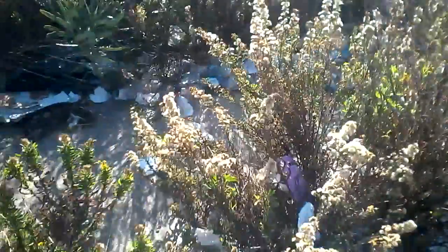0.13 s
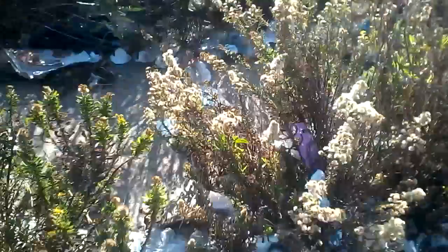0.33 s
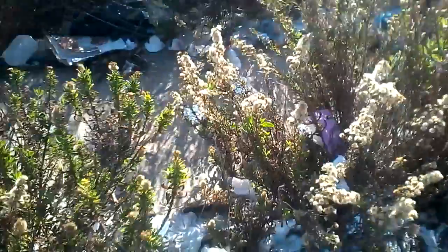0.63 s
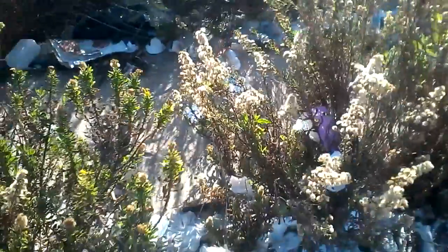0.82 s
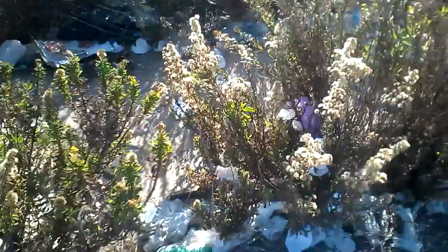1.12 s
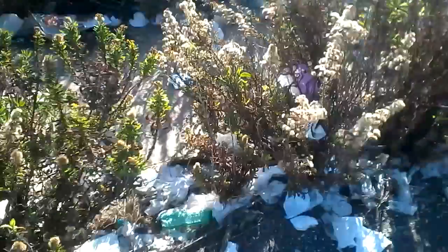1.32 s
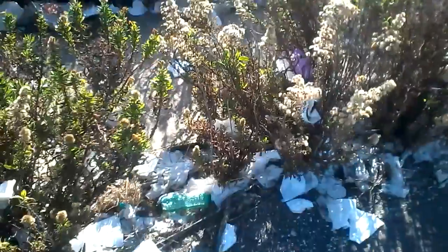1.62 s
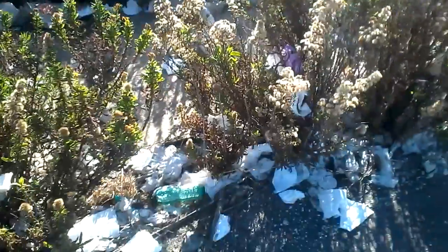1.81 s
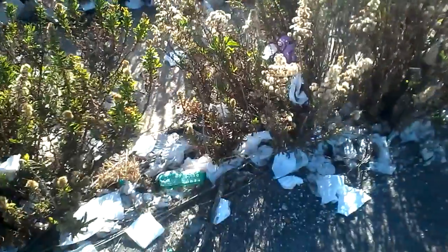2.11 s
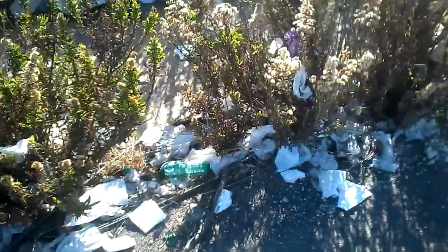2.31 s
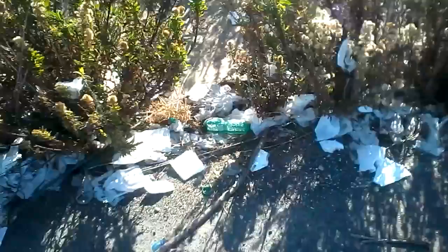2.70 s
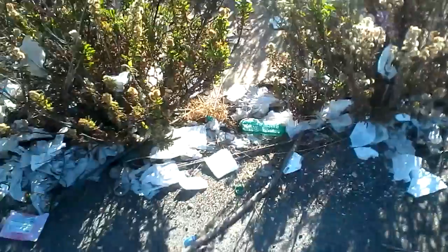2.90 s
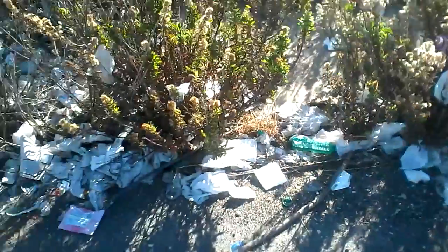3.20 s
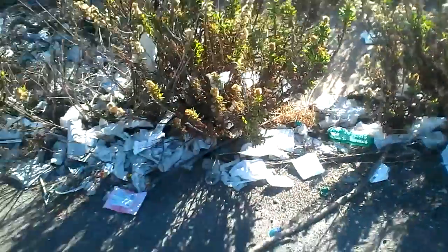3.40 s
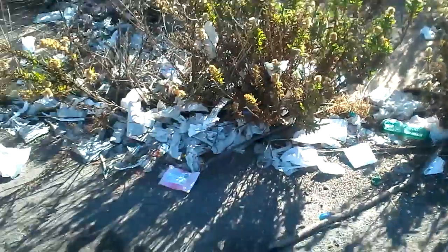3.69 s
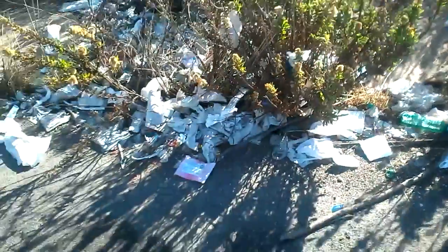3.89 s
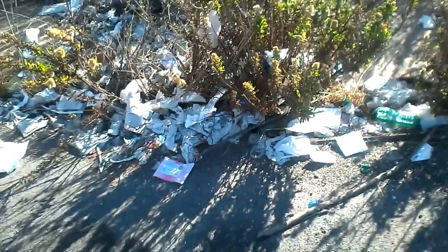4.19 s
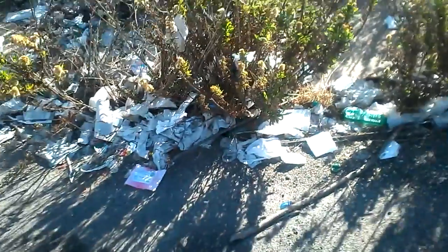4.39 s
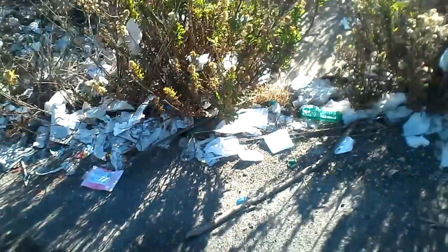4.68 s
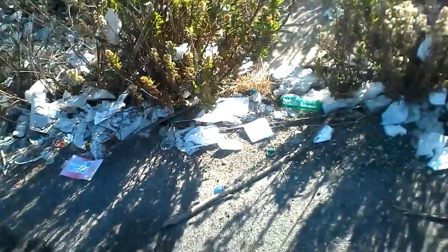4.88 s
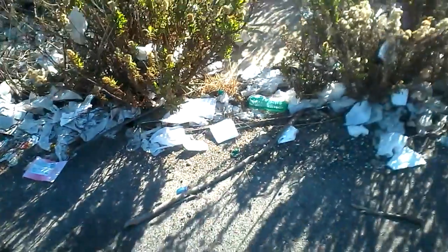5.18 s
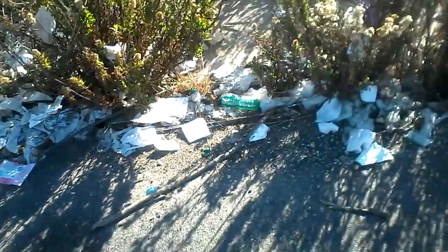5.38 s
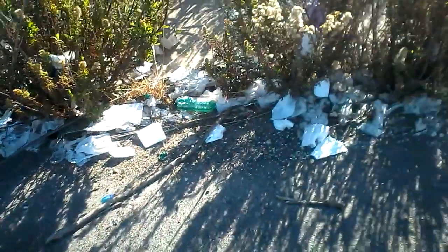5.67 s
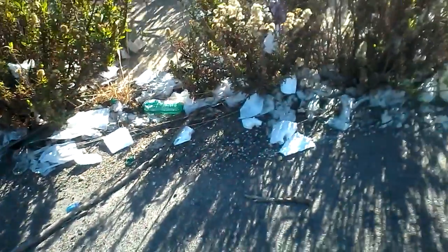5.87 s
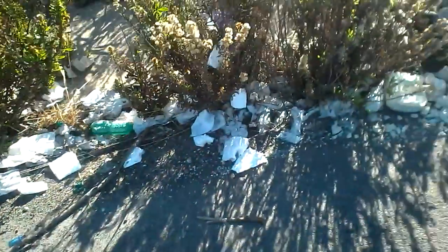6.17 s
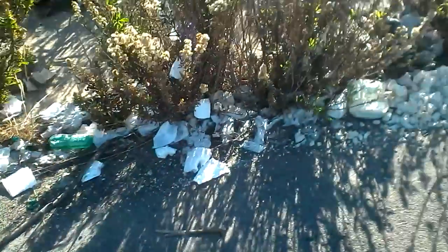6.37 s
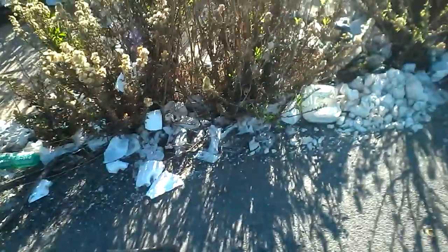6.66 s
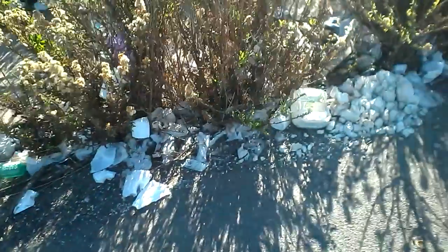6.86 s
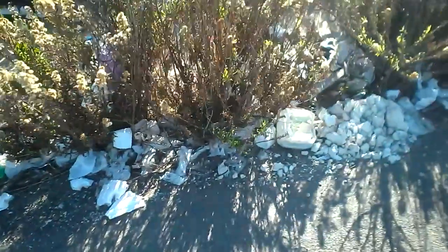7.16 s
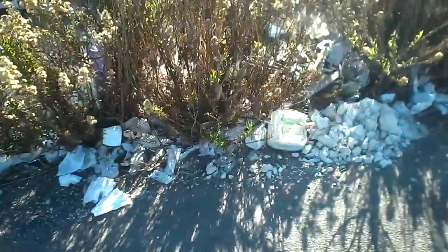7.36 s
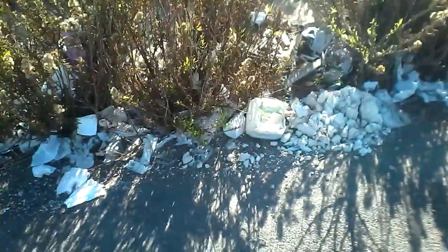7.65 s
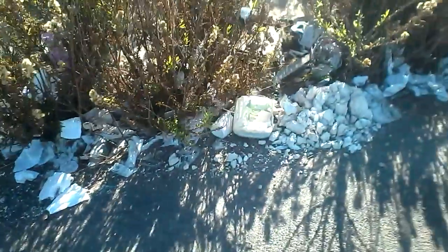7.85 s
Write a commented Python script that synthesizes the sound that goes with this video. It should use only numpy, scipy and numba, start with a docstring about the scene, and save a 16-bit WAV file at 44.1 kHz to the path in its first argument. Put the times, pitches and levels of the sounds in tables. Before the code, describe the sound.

Close, slightly muffled outdoor sound from a small microphone exposed to wind, highs cut off. From 0 to 1.2 s gusts rumble and flutter, with a rushing start, small pops, and short gritty scrapes and cracks underfoot at 0.1 to 0.5 s. The wind sinks from 1.5 to 2.7 s, exposing faint distant machine hum and hiss, a sharp grit snap at 1.9 s and more near 2.5 s. Around 3 s a bright crunchy scuff leads into the heaviest buffeting, 3.1 to 3.8 s, with dense thumps and loud pops, squeezed at the peaks. It drops near 4.2 s, where a faint mid-pitched distant tone briefly passes. A burst with a very hard pop hits at 4.9 s, smaller cracks follow near 5.4 s, and rumbling gusts return from 5.8 to 6.9 s. The wind then eases, with sparse small grit cracks from 7.2 to 7.6 s and a soft windy end at 8 s.

```python
"""Gusty wind and gritty footsteps

Someone shuffles along the gritty edge of a road holding a small camera in a gusty wind.
Wind is filtered lumpy noise: a rumble, a rush, short buffets and pressure pops on the microphone port.
Under the soles grit cracks as ringing noise snaps and scrapes as dense random clicks.
Far industry hums as coloured noise, one distant sine sounds briefly; a limiter holds the strongest gusts."""
import sys
import numpy as np
from scipy import signal
from scipy.fft import rfft, irfft
from scipy.io import wavfile
from scipy.ndimage import uniform_filter1d, minimum_filter1d
from numba import njit

SR = 44100
rng = np.random.default_rng(int(sys.argv[2]) if len(sys.argv) > 2 else 0)


def transcribe(u):
    """Save the signal u as a 16-bit wav file named by the first command-line argument.

    u: samples, shape (n,) or (channels, n), limited to [-1, 1]; the rate is SR.
    q: integer samples, one column per channel.
    """
    v = np.clip(np.atleast_2d(u).T, -1, 1)
    q = np.round(v * 32767).astype(np.int16)
    wavfile.write(sys.argv[1], SR, q)


N = 353770

# hard eddies slapping the port:
# (time [s], nominal length [ms], level before trim [dB], brightness [dB], low thump level [dB])
HARD_EDDIES = [(0.015, 7, -23, -9.5, -33), (0.031, 21, -24, -20, -37), (0.104, 36, -31, -24, -28),
               (.24, 18, -43, -32, -25), (0.409, 11, -36, -26, -36), (0.425, 13, -23.5, -26.5, -31),
               (0.512, 27, -30.5, -8, -45), (0.662, 22.4, -18, -13.5, -21), (0.734, 14, -27.5, -25.5, -26),
               (0.818, 20, -26.5, -23, -17), (0.857, 19, -31, -22, -22), (1.09, 16, -33, -26, -31),
               (1.136, 11, -31, -25, -22), (2.979, 15, -30, -19, -36), (3.051, 12, -27, -31, -23),
               (3.12, 11.4, -16.5, -30.5, -23), (3.147, 28, -14, -17, -15), (3.228, 32, -18.5, -12.5, -27),
               (3.26, 20, -21.5, -19, -19.5), (3.297, 12, -33, -27, -18.5), (3.366, 42, -22, -16, -24),
               (3.401, 51, -23, -20, -25), (3.444, 41.6, -9.5, -21, -20.5), (3.478, 13, -16, -13, -17),
               (3.591, 17.6, -12, -13, -23), (3.607, 21.4, -8.5, -19, -21.5), (3.677, 26, -24, -31, -27),
               (3.773, 13.4, -17, -24, -15.5), (3.808, 9.7, -30, -26, -29), (4.272, 20, -24, -26, -20.5),
               (4.584, 4, -25, -28, -40), (4.712, 11, -31, -23, -38), (4.749, 15, -17, -21, -18),
               (4.82, 12, -27, -17, -24), (4.837, 32, -20.5, -22.5, -20.5), (4.866, 27, -20, -15, -25),
               (4.88, 43, -17, -14, -25), (4.915, 12.8, -14, -17, -14.5),
               (4.958, 17.5, -25.5, -16.5, -36.5), (5.041, 11, -35, -23, -28), (5.267, 15, -21.5, -31, -33),
               (5.51, 21, -23, -32.5, -28), (5.606, 18, -25, -30, -27), (5.667, 10, -30, -36, -21),
               (5.752, 73, -35, -15.5, -24.5), (5.806, 20.5, -12.5, -23.5, -20.5),
               (5.865, 11, -38, -30, -19), (5.895, 21, -30, -21.5, -25), (6.064, 11, -18.5, -26, -14.5),
               (6.149, 24, -30, -25.5, -25), (6.197, 12, -24.5, -18, -25), (6.248, 11, -15.5, -26.5, -13.5),
               (6.296, 13, -23.5, -18, -19), (6.323, 18, -15, -24.5, -17), (6.371, 40, -25.5, -17, -28),
               (6.508, 21, -28, -17, -16.5), (6.55, 28, -20, -25, -18), (6.703, 6.4, -25, -32, -31.5),
               (6.747, 26, -22, -30.5, -22.5), (6.773, 26.6, -20.5, -18.5, -23),
               (6.985, 10.5, -25.5, -34, -21.5), (7.215, 9.9, -38, -33, -26), (7.57, 13, -42.5, -30, -27)]
# soles dragged over grit: (start [s], length [s], level [dB], centre [Hz])
SOLE_DRAGS = [(.105, 0.022, -46.5, 5000), (0.251, 0.22, -60, 4000), (0.471, 0.164, -44, 2950),
              (1.865, .09, -56, 3500), (2.447, 0.092, -51, 4500), (2.805, 0.2, -63, 3500),
              (2.948, 0.11, -44, 6000), (3.021, 0.19, -57, 5460), (3.325, 0.19, -45.5, 3500),
              (4.0, 0.16, -64, 2500), (5.395, 0.031, -52, 3500), (6.195, 0.14, -68, 3000),
              (6.529, 0.064, -51, 2800), (6.752, 0.048, -53, 2600), (7.2, 0.099, -72, 3000)]


def undb(db):
    """Gain of a level in dB."""
    return 10 ** (np.asarray(db) / 20)


def rms(x):
    """Root mean square."""
    return np.sqrt(np.mean(x ** 2))


def unit(x):
    """Scaled to rms 1."""
    return x / rms(x)


@njit
def svf(x, hz, k):
    """State-variable filter with a moving centre and damping k: rows low-pass, band-pass."""
    y, b, l = np.empty((2, len(x))), 0., 0.
    for i in range(len(x)):
        g = np.tan(np.pi * hz[i] / SR)
        v = (b + g * (x[i] - l)) / (1 + g * (g + k))
        y[0, i], y[1, i] = l + g * v, k * v
        b, l = 2 * v - b, l + 2 * g * v
    return y


def low(x, hz, k=1.537):
    """Two-pole low-pass."""
    return svf(x, np.clip(hz + 0 * x, 20, SR / 4), k)[0]


def band(x, hz, width):
    """Two-pole band-pass."""
    return svf(x, hz + 0 * x, width / hz)[1]


def smooth_twice(x, size):
    """Two running means in a row."""
    return uniform_filter1d(uniform_filter1d(x, size), size)


def walk(rate):
    """Random levels held 1 / rate s and slewed twice; spread 1."""
    hold = int(SR / rate)
    steps = np.repeat(rng.standard_normal(N // hold + 1), hold)
    return unit(smooth_twice(steps, hold)[:N])


def steady(x, s):
    """Level evened out over s seconds, so that a curve sets the loudness."""
    return x / np.sqrt(smooth_twice(x ** 2, int(s * SR)))


def add(out, s, x):
    """Mixes x into out from time s."""
    i = int(s * SR)
    out[i:i + len(x)] += x[:N - i]


def yard():
    """Far machines and hiss as noise shaped to a smooth spectrum, plus one brief distant sine."""
    # far machines and microphone hiss: (frequency [Hz], relative density [dB per Hz])
    spectrum = [(150, -32.5), (250, -2), (529, -13.5), (848, -8), (968, -13), (1090, -14), (1210, -16),
                (2340, -19), (3590, -26), (6850, -27), (8420, -36), (10900, -77.5), (18500, -120)]
    # distant tone: (time [s], level [dB])
    tone_curve = [(3.85, -71), (3.95, -56), (4.1, -51), (4.35, -56), (4.5, -77.5)]
    hiss_db, waver_db, tone_hz = -51.5, .5, 645
    f, t = np.maximum(np.arange(N // 2 + 1) * SR / N, 1), np.arange(N) / SR
    points_hz, points_db = np.transpose(spectrum)
    colour_db = np.interp(np.log(f), np.log(points_hz), points_db)
    hiss = unit(irfft(rfft(rng.standard_normal(N)) * undb(colour_db), N))
    hiss = hiss * undb(hiss_db + waver_db * walk(2.92))
    tone_gain = np.sqrt(2) * undb(np.interp(t, *np.transpose(tone_curve)))
    return hiss + tone_gain * np.sin(2 * np.pi * tone_hz * t)


def scuffs():
    """Dense uneven clicks while a sole slides, ringing in the grit."""
    # ring of stones and sole: (centre [Hz], width [Hz], level [dB])
    ring_bands = [(2270, 320, 13.5), (4300, 1800, -19), (6800, 2200, -13)]
    clicks_per_s = 2200
    out, size = np.zeros(N), SR // 4
    t = np.arange(size) / SR
    for s, length_s, db, hz in SOLE_DRAGS:
        clicks = (rng.random(size) < clicks_per_s / SR) * rng.standard_normal(size)
        clicks = clicks * undb(1.2 * rng.exponential(1, size))
        clicks = clicks * undb(3.3 * walk(146)[:size])
        ring = sum(undb(g) * band(clicks, 1. * f, w) for f, w, g in ring_bands)
        body = band(ring, 1. * hz, 0.47 * hz) + undb(-5.0) * band(clicks, 1100., 1200.)
        slide = np.sin(np.pi * np.clip(t / length_s, 0, 1) ** 0.56)
        add(out, s, unit(body * slide) * rms(slide) * undb(db))
    return out


def small_grains(count):
    """Crack rows at chance times along each drag, at most count each; longer drags hold more."""
    grains_per_s = 41
    mid_db, mid_hz, mid_treble_db, mid_knock_db = -42.5, 2610, -14.5, 0
    rows = []
    for s, length_s, _, _ in SOLE_DRAGS:
        place_s = rng.random(count) * count / grains_per_s
        chance = rng.standard_normal((count, 4))
        for p, c in zip(place_s, chance):
            if p < length_s:
                rows.append((s + p, mid_db + 3.1 * c[0], mid_hz * undb(1.5 * c[1]),
                             mid_treble_db + 6.0 * c[2], mid_knock_db + 6.0 * c[3]))
    return rows


def cracks():
    """A grain splits: a ring at its own pitch, a bright snap and a dull knock through the sole."""
    # loudest grains: (time [s], peak of ring and snap [dB], pitch [Hz],
    # treble against ring [dB], knock peak against ring and snap [dB])
    loud_grains = [(0.108, -34, 3270, -12, 5), (0.116, -36, 4390, 14, -5), (0.2602, -40.5, 4390, -21, 1),
                   (0.304, -30.5, 4390, -15, -6), (0.345, -37, 2670, -8, 4), (0.368, -36, 3010, -16, 0),
                   (0.504, -28, 2500, -19, -17), (0.5219, -28.5, 2500, -24, 9.5),
                   (0.5477, -34.5, 2580, -19, 10.5), (1.4833, -39.5, 2330, -10, -14),
                   (1.5022, -36, 3700, -12, 3), (1.8912, -20, 3270, -31, -12),
                   (1.9115, -42, 2840, -17, -15), (1.9686, -29, 3100, -22, -11),
                   (2.456, -35, 5170, -20, 5.5), (2.4694, -35, 6800, 13, -7), (2.505, -24, 2670, -31, -4),
                   (2.6895, -36.5, 2410, -12, 5.5), (2.836, -39, 4220, -1, 3), (2.8953, -30, 2840, -14, 1),
                   (2.9644, -31, 2760, 1, 4), (2.9775, -20, 6720, 10, -26), (2.9855, -35, 3360, 5, -11),
                   (3.01, -30, 2670, 14, -8), (3.0399, -34, 2840, -3, -15), (3.0691, -34, 6980, 12, -13),
                   (3.0781, -31, 2500, -1, -16), (3.0973, -32.5, 2930, 2, -13), (3.117, -36, 6980, 7, -10),
                   (3.3694, -25, 1980, -22, 7), (3.406, -32.5, 2670, -23, 12), (3.4625, -32, 2500, -23, 3),
                   (3.6117, -29.5, 1980, 3, 9.5), (4.0853, -32, 1980, -16, -7),
                   (4.9661, -28, 1980, -22, -2), (5.406, -31.5, 2580, -1, -8), (5.4865, -29, 2500, -10, 2),
                   (6.2554, -38.5, 1980, -9, 9), (7.244, -41.5, 3700, -18, 8.5),
                   (7.2907, -38.5, 2580, -18, 9.5), (7.4868, -37.5, 2840, -14, -18),
                   (7.5564, -35.5, 3100, -16, 4.5), (7.632, -33, 3010, -7, -12)]
    out, t = np.zeros(N), np.arange(SR // 50) / SR
    for s, db, hz, treble_db, knock_db in [*loud_grains, *small_grains(count=10)]:
        snap = rng.standard_normal(len(t)) * t * np.exp(-t / 0.00044)
        ring = unit(band(band(snap, 1. * hz, .5 * hz), 1. * hz, hz))
        bright = unit(band(band(snap, 5800., 3500.), 5800., 3500.))
        crack = ring + undb(treble_db) * bright
        crack = crack / np.abs(crack).max()
        knock = band(band(snap, 930.0, 620.0), 820.0, 810.0)
        knock = knock / np.abs(knock).max()
        add(out, s, undb(db) * (crack + undb(knock_db) * knock))
    return out


def eddies(count, lumpy_db, rate):
    """Noise whose size jumps from eddy to eddy, with scattered kicks where a small vortex bursts."""
    kicks_per_s = 400
    kicks = (rng.random(count) < kicks_per_s / SR) * undb(14.0 + 3.64 * rng.exponential(1, count))
    return rng.standard_normal(count) * (1 + kicks) * undb(lumpy_db * walk(rate)[:count])


def wind_db(s):
    """Levels of rumble and rush at times s, before flutter and shoves."""
    # wind on the port: (time [s], rumble level [dB], rush level [dB])
    gusts = [(0, -21, -16.5), (.12, -23.5, -21), (0.201, -27.5, -35), (.38, -19, -24), (.47, -20, -26),
             (.61, -25.5, -32), (.72, -18.5, -26.5), (.78, -24, -29.5), (0.869, -17.5, -24),
             (1.15, -23.5, -30.5), (1.25, -24.5, -30), (1.4, -22.5, -32), (1.8, -31.5, -37),
             (1.96, -28.5, -34.5), (2.17, -38.5, -51), (2.32, -32.5, -44.5), (2.66, -38, -44.5),
             (2.75, -21.5, -39), (2.84, -23, -41), (2.92, -39.5, -45), (3.15, -17.5, -21.5),
             (3.33, -13, -18), (3.49, -12.5, -19.5), (3.55, -25, -21.5), (3.64, -20.5, -20.5),
             (3.74, -31, -43), (3.8, -22, -27.5), (4.02, -25, -30), (4.22, -37.5, -44), (4.31, -25.5, -41),
             (4.46, -32, -34), (4.66, -25, -29), (4.92, -19.5, -17.5), (5.0, -28.5, -31), (5.07, -18, -23),
             (5.15, -25, -33), (5.29, -20, -27.5), (5.45, -29.5, -40.5), (5.7, -23, -29),
             (5.91, -14.5, -22), (5.989, -31, -38), (6.12, -25.5, -30), (6.24, -15, -24),
             (6.42, -15, -23.5), (6.49, -20, -28), (6.599, -17, -24.5), (6.82, -21, -23.5),
             (6.941, -28.5, -38), (7.05, -22, -29.5), (7.45, -28.5, -41.5), (7.7, -37, -42),
             (7.85, -27.5, -34), (8.02, -28.5, -33)]
    times, *columns = np.transpose(gusts)
    return [np.interp(s, times, c) for c in columns]


def shoves():
    """Gain that jumps at each hard eddy and dies away."""
    base_s = .011  # the eddy's own length is added
    out, t = np.zeros(N), np.arange(SR // 5) / SR
    for s, length_ms, _, _, thump_db in HARD_EDDIES:
        u = t / (base_s + length_ms / 1000)
        add(out, s - .002, undb(thump_db) * np.tanh(4.2 * u) * np.exp(-u ** 2.1))
    return out


def wind():
    """A slow rumble and a rush above it, whose edge climbs with the rush level."""
    edge_ref_hz, edge_ref_db, edge_db_per_db = 611, -16.5, 0.3468
    rush_shove_db = -2  # against the rumble's shove
    rumble_db, rush_db = wind_db(np.arange(N) / SR)
    flutter_db, shove = 1.65 * walk(22), shoves()
    rumble = low(band(eddies(N, lumpy_db=2.0, rate=30), 98.0, 110.), 170.0)
    edge_hz = edge_ref_hz * undb(edge_db_per_db * (rush_db - edge_ref_db))
    rush = band(eddies(N, lumpy_db=3, rate=120), 180.0, 290.0)
    rush = low(low(rush, edge_hz), 2.14 * edge_hz)
    rumble_gain = undb(rumble_db + flutter_db) + shove
    rush_gain = undb(rush_db + 1.35 * flutter_db + 2.75 * walk(28)) + undb(rush_shove_db) * shove
    return steady(rumble, 0.059) * rumble_gain + steady(rush, 0.06) * rush_gain


def small_eddies(count):
    """Rows like HARD_EDDIES, without a thump, at chance times; level follows the rush."""
    against_rush_db, mid_ms, mid_bright_db = -9.5, 24.7, -21  # level before trim
    when_s, chance = rng.random(count) * (N / SR), rng.standard_normal((count, 3)).T
    length_ms = mid_ms * undb(5.1 * chance[0])
    level_db = wind_db(when_s)[1] + against_rush_db + 2.7 * chance[1]
    bright_db = mid_bright_db + 3.0 * chance[2]
    return np.transpose([when_s, length_ms, level_db, bright_db])


def buffets():
    """Each eddy is a short swell of lumpy noise; its brightness sets how high it reaches."""
    trim_db = 1.5
    out, size = np.zeros(N), SR // 8
    ms = np.arange(size) / SR * 1000
    lumps = eddies(N, lumpy_db=3.5, rate=300)
    for k, (s, length_ms, db, bright_db, *_) in enumerate([*HARD_EDDIES, *small_eddies(count=75)]):
        edge_hz = 900 * undb(.5 * (bright_db + 24.5))
        noise = lumps[k * 2500:][:size]  # another stretch for each eddy
        noise = low(low(band(noise, 452.0, 700.), edge_hz), 0.86 * edge_hz)
        u = ms / np.clip(0.86 * length_ms, 2, 40)
        swell = np.tanh(4.1 * u) * np.exp(-u ** 2.4)  # quick rise, tapered end
        add(out, s, unit(noise * swell) * rms(swell) * undb(db + trim_db))
    return out


def small_pops(count):
    """Pop rows at chance times; peak follows the rush."""
    against_rush_db, mid_sharp_db = -6.5, -15
    when_s, chance = rng.random(count) * (N / SR), rng.standard_normal((count, 2)).T
    peak_db = wind_db(when_s)[1] + against_rush_db + 3.5 * chance[0]
    return np.transpose([when_s, peak_db, mid_sharp_db + 4.5 * chance[1]])


def pops():
    """One quick push and pull of pressure; the sharper, the shorter."""
    # strongest pops inside the gusts: (time [s], peak [dB], sharpness [dB])
    strong_pops = [(0.0231, -16.5, -10), (0.6756, -23, -21), (0.823, -24.5, -13), (3.1234, -12.5, -24.5),
                   (3.1502, -8.5, -17.5), (3.1569, -6, -34), (3.173, -6, -7.5), (3.239, -12.5, -21),
                   (3.446, -16, -14), (3.467, -14.5, -10.5), (3.4871, -4, -24), (3.57, -24, -13),
                   (3.5971, -13, -17), (3.612, -10, -7), (3.6269, -4, -27.5), (4.2879, -15, -26),
                   (4.7593, -17, -12), (4.8249, -13, -12), (4.8922, 2, -15.5), (4.9177, -8, -17),
                   (5.8175, -10, -17), (5.8316, -12, -29), (6.202, -21, -22), (6.2528, -9, -20.5),
                   (6.302, -20, -24), (6.3274, -3, -25), (6.7784, -9, -25.5)]
    out, t = np.zeros(N), np.arange(-SR // 100, SR // 100) / SR
    rows = [*strong_pops, *small_pops(count=60)]
    sides = rng.choice([-1, 1], len(rows))
    for (s, db, sharp_db), side in zip(rows, sides):
        u = t / (0.00023 * undb(-.4 * (sharp_db + 13.0)))
        pulse = (u + 0.072) * np.exp(-np.abs(u) ** 1.67)
        add(out, max(s + t[0], 0), side * undb(db + 7) * pulse)  # 7 dB brings the pulse peak to about 1
    return out


def scene():
    """Everything at the one microphone port."""
    return (yard() + scuffs() + cracks() + wind() + buffets() + pops())[None]


def record(dry):
    """The input cuts the deepest bass and the top, a limiter ducks peaks to full scale, the top is cut again."""
    wet = signal.sosfilt(signal.butter(3, 46, "high", fs=SR, output="sos"), dry)
    wet = signal.sosfilt(signal.butter(6, 7500, fs=SR, output="sos"), wet)
    gain = minimum_filter1d(1 / np.maximum(np.abs(wet), 1), size=301)
    wet = wet * smooth_twice(gain, 151)
    return signal.sosfilt(signal.ellip(8, .2, 70, 8450, fs=SR, output="sos"), wet)


dry = scene()
out = record(dry)
transcribe(out)
```